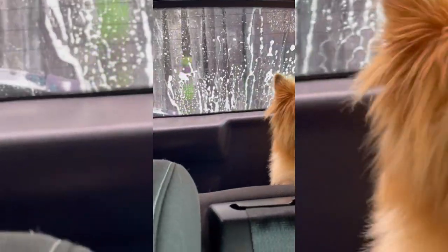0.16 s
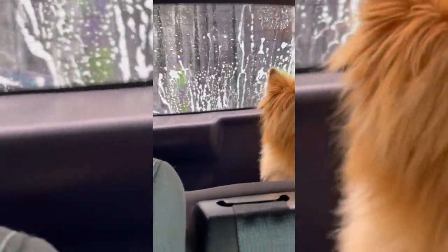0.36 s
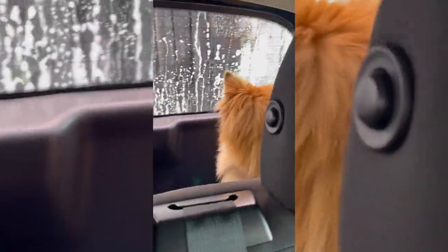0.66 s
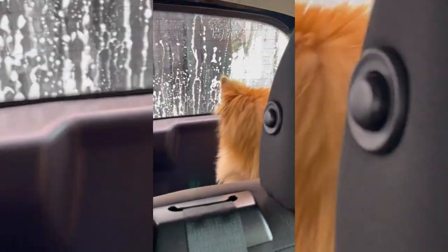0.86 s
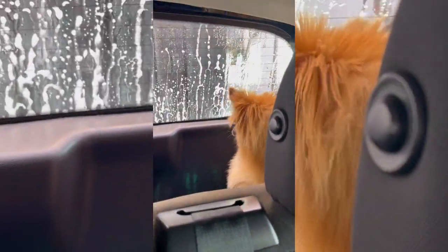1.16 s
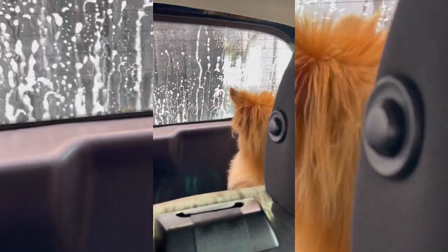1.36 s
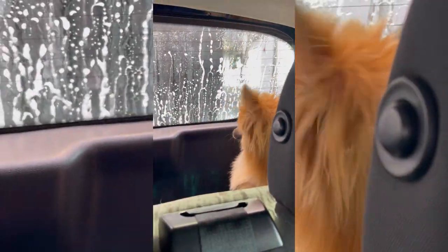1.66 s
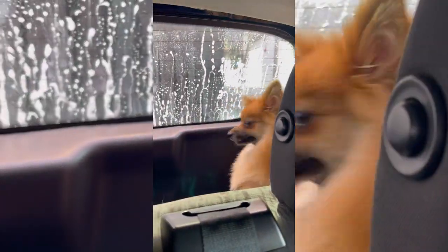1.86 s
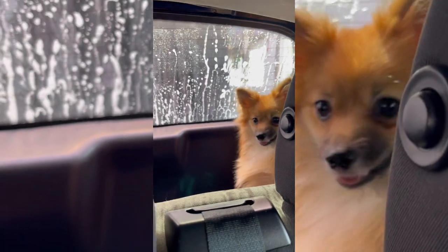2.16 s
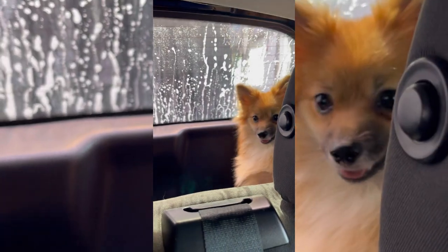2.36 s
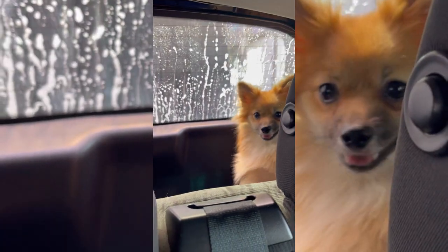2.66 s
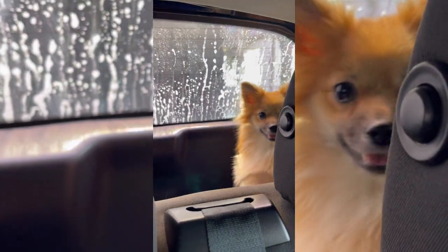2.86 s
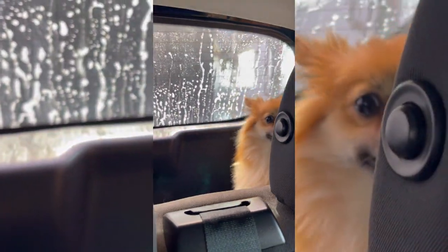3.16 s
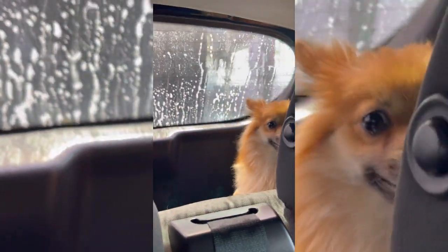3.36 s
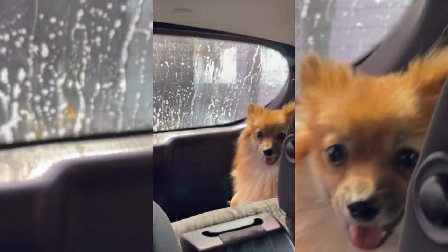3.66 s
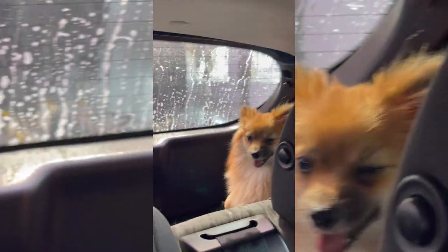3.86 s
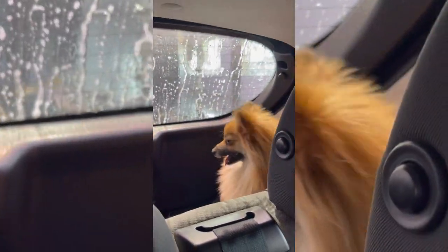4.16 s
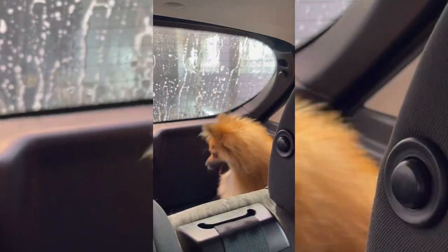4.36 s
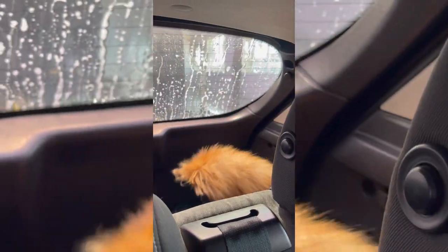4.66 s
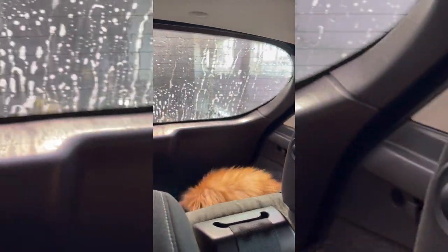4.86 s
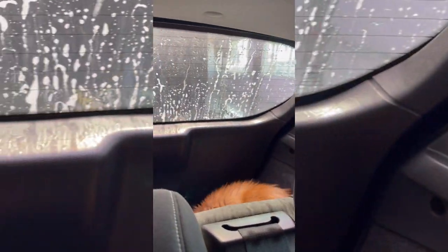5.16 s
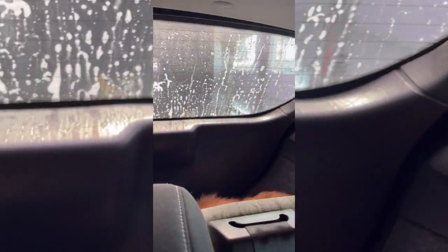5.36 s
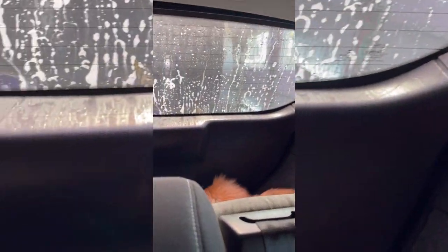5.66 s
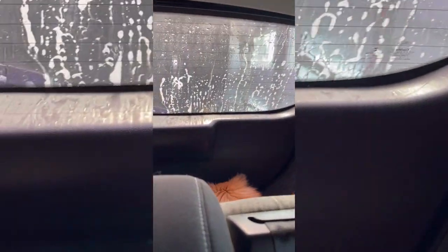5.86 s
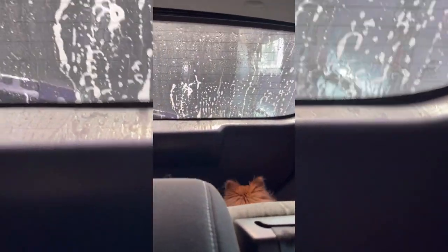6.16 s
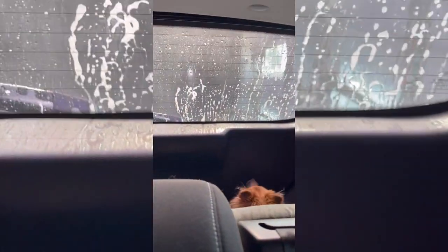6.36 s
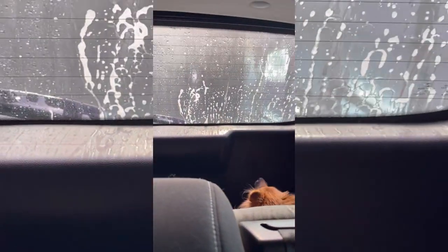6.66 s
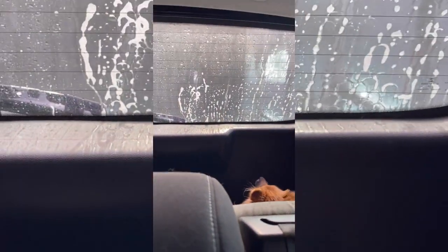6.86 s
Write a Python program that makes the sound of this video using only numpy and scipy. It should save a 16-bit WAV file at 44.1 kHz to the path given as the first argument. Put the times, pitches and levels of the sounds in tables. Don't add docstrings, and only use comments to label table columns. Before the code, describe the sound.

Heard from inside a closed car at a wash: a deep, unsteady motor hum and rumble run throughout, with a faint pump whine. Pressure jets sweep past in pairs of short hisses, while water thuds dully on roof and doors. The sweeps soften midway, then the spray closes in, splashing brightly on the glass and booming on the sheet metal. A phone microphone in the cabin catches it in stereo.

```python
import sys
import numpy as np
from scipy import signal
from scipy.fft import rfft, irfft, next_fast_len
from scipy.io import wavfile
from scipy.ndimage import uniform_filter1d, map_coordinates

SR = 44100
rng = np.random.default_rng(int(sys.argv[2]) if len(sys.argv) > 2 else 0)


def makeup_ratio(level_db):
    decades = np.asarray(level_db, float) / 20
    return 10 ** decades


def master_out(mix):
    frames = np.transpose(np.atleast_2d(mix))
    ceiling = np.clip(frames, -1, 1)
    pcm = np.round(ceiling * 32767).astype(np.int16)
    wavfile.write(sys.argv[1], SR, pcm)


N = 309141


def unit(x):
    return x / np.sqrt(np.mean(x ** 2) + 1e-20)


def along(points, hz):
    f, v = np.transpose(points)
    return np.interp(np.log(hz + 1), np.log(f + 1), v)


def gains(rows):
    s, *cols = np.transpose(rows)
    return [makeup_ratio(np.interp(np.arange(N) / SR, s, c)) for c in cols]


def wobble(rate_hz):
    knots = rng.standard_normal(int(N * rate_hz / SR) + 4)
    return map_coordinates(knots, [np.arange(N) * rate_hz / SR])


def filtered(x, response):
    m = next_fast_len(N + 8192)
    return irfft(rfft(x, m) * response(np.fft.rfftfreq(m, 1 / SR)), m)[..., :N]


def coloured(x, spectrum):
    return unit(filtered(x, lambda hz: makeup_ratio(along(spectrum, hz))))


def modes(table):
    def response(hz):
        ring = 0
        for k, (centre_hz, width_hz, db) in enumerate(table):
            damping = 1j * hz * width_hz
            ring = ring + (-1) ** k * makeup_ratio(db) * damping / (centre_hz ** 2 - hz ** 2 + damping)
        return ring / (1 + 1j * hz / (3 * table[-1][0])) ** 2
    return response


def water(density, spread_db, patchy_db):
    z = rng.standard_normal((2, 2, 257, N // 256 + 2))
    field = uniform_filter1d(rng.standard_normal(z.shape[2:]), 6, 0)
    patches = makeup_ratio(patchy_db * unit(uniform_filter1d(field, 12, 1)))
    bed = signal.istft((z[0] + 1j * z[1]) * patches, window="cosine", nperseg=512)[1][:, :N]
    at = rng.integers(N, size=int(density * N / SR))
    size = makeup_ratio(spread_db * rng.standard_normal(len(at)))
    drops = np.zeros((2, N))
    drops[:, at] = size * rng.choice([-1, 1], (2, len(at)))
    return unit(bed) + 0.65 * unit(drops)


def passes(rows, rise_db_s, fall_db_s, swell_db, crest, steep):
    hop = 64
    s, length, *levels = np.transpose(rows)[:, :, None]
    t = np.arange(0, N + hop, hop) / SR - s
    arch_db = -swell_db * ((np.clip(t / length, 0, 1) - crest) / crest) ** 2
    shape_db = rise_db_s * np.minimum(t, 0) - fall_db_s * np.maximum(t - length, 0) + arch_db
    curves = []
    for db, k in zip(levels, [1, steep]):
        gain = np.sqrt(np.sum(makeup_ratio(2 * (db + k * shape_db)), axis=0))
        curves.append(np.interp(np.arange(N), np.arange(t.shape[1]) * hop, gain))
    return curves


def pumps():
    # (time [s], hum [dB], whine [dB])
    motor_load = [(0.0, -27, -52), (0.19, -31, -52), (0.3, -31, -34), (0.53, -23.5, -52), (1.03, -27, -46),
                  (1.31, -19.5, -56), (1.64, -25.5, -35), (1.91, -23, -55), (2.05, -41, -41),
                  (2.34, -30, -51), (2.75, -34.5, -44), (2.95, -21.5, -44), (3.2, -32, -43),
                  (4.04, -27, -44), (4.72, -48, -48.5), (5.4, -24.5, -38), (6.1, -26.5, -42),
                  (7.01, -40, -37)]
    # (frequency [Hz], level [dB/Hz])
    cabin_spectrum = [(15, -47), (30, -7.5), (45, 2), (60, 0), (80, -4.5), (250, -9), (500, -26),
                      (1000, -39.5), (2000, -39), (5000, -51.5), (9500, -53), (10800, -86), (12000, -84),
                      (16000, -120)]
    hum_hz, whine_hz, whine_width_hz = 59.17, 713.5, 7
    hum_waver_db = 1 * (wobble(5) + wobble(16))
    whine_waver_db = 1.5 * wobble(7)
    hum_gain, whine_gain = gains(motor_load) * makeup_ratio([hum_waver_db, whine_waver_db])
    hum = np.sin(2 * np.pi * np.cumsum(hum_hz * (1 + 0.02 * wobble(6))) / SR)
    whine = unit(filtered(rng.standard_normal(N), modes([(whine_hz, whine_width_hz, 0)])))
    lines = hum_gain * hum + 0.56 * whine_gain * whine
    bay = coloured(water(density=3000, spread_db=-4.0, patchy_db=1.5), cabin_spectrum)
    rumble = makeup_ratio(-27.5 + 0.6 * wobble(2.81)) * bay
    return rumble + lines * [[1], [0.3]]


def follow(db, power):
    # (time [s], level [dB])
    nearness = [(0.0, -59.5), (0.8, -55.5), (1.5, -55), (2.2, -57), (3.2, -55), (3.7, -53), (4.2, -53),
                (4.45, -50), (4.75, -53.5), (5.25, -52.5), (5.57, -45.5), (5.92, -48.5), (6.0, -42),
                (6.45, -40.5), (6.54, -43), (6.63, -39.5), (6.83, -42.5), (7.01, -40)]
    return makeup_ratio(db) * (gains(nearness)[0] / makeup_ratio(-56)) ** power


def gouts():
    # (time [s], length [s], roof level [dB], door level [dB])
    landings = [(0.25, 0.029, -26.5, -50), (0.74, .1, -27, -50), (0.98, 0.02, -25.5, -35),
                (1.26, .04, -21.5, -36), (1.47, 0.019, -22.5, -42), (1.76, 0.038, -21, -37),
                (1.97, 0.035, -22.5, -54), (2.28, 0.18, -26.5, -37), (2.79, 0.12, -27, -41),
                (3.04, 0.035, -26.5, -37), (3.4, 0.057, -25.5, -34), (3.59, 0.034, -29, -34.5),
                (3.87, 0.11, -27, -34.5), (4.29, 0.13, -24, -25), (4.57, 0.026, -27.5, -24.5),
                (4.82, 0.077, -20.5, -28), (5.05, 0.084, -19.5, -29.5), (5.39, .04, -20, -26.5),
                (5.51, .04, -30, -26), (5.63, 0.013, -20, -24.5), (5.85, 0.1, -26, -24.5),
                (6.09, 0.048, -15, -22.5), (6.37, 0.085, -14.5, -22.5), (6.55, .03, -23, -36),
                (6.61, 0.037, -11, -26.5), (6.72, 0.037, -27.5, -43), (6.89, 0.094, -14.5, -22.5)]
    return passes(landings, rise_db_s=200, fall_db_s=142, swell_db=0.5, crest=0.5, steep=0.93)


def flows():
    # (time [s], length [s], sizzle [dB], swish [dB])
    strokes = [(0.71, 0.09, -60, -54), (0.92, 0.09, -57, -52), (1.205, 0.13, -52.5, -49),
               (1.42, 0.094, -50.5, -48.5), (1.715, 0.16, -50.5, -48.5), (1.93, 0.1, -49.5, -47.5),
               (2.255, .13, -49, -46), (2.44, 0.1, -49.5, -47), (2.76, 0.15, -49.5, -45.5),
               (2.95, 0.11, -51, -47.5), (3.27, .13, -48.5, -47), (3.44, 0.13, -50, -49),
               (3.785, 0.15, -50.5, -50.5), (3.95, 0.16, -53, -53), (4.28, 0.15, -54, -53),
               (4.47, .15, -56, -59), (4.81, 0.16, -58, -57), (5.01, 0.17, -58.5, -58),
               (5.31, 0.087, -56, -56), (5.52, 0.31, -56, -64), (5.82, 0.19, -49, -51),
               (6.04, 0.26, -49, -47), (6.31, 0.11, -44.5, -44.5), (6.44, 0.035, -53, -56),
               (6.56, 0.2, -45.5, -46), (6.79, .2, -42.5, -42)]
    shape = dict(fall_db_s=226, swell_db=1.5, crest=0.69, steep=0.8)
    out_strokes = passes(strokes[0::2], rise_db_s=800, **shape)
    back_strokes = passes(strokes[1::2], rise_db_s=250, **shape)
    sizzle, swish = makeup_ratio(1.0) * np.hypot(out_strokes, back_strokes)
    door = gouts()[1]
    return (np.hypot(sizzle, follow(db=-73.5, power=2.0)),
            np.hypot(swish, follow(db=-60.5, power=0.77)),
            np.hypot(makeup_ratio(-7) * swish, follow(db=-55.5, power=1.08)),
            np.hypot(makeup_ratio(-16) * door, follow(db=-45.5, power=0.46)))


def jet(sizzle, swish, splash, wash):
    # (frequency [Hz], level [dB/Hz])
    fine_spectrum = [(6000, -33), (7500, -6), (9000, -0.5), (10800, 5), (12000, -10.5), (13000, -19),
                     (14000, -24), (16000, -55)]
    swish_spectrum = [(2000, -21), (3500, -9), (4800, -5), (6200, -0.5), (7500, -5), (8800, -23),
                      (10500, -34)]
    coarse_spectrum = [(900, -29), (1700, -7.5), (2500, -1.5), (3300, -6), (4500, -4), (6500, -12.5),
                       (9000, -69)]
    wash_spectrum = [(350, -42), (600, 4.5), (800, -0.5), (950, 0), (1400, -2.5), (1700, -8.5), (2100, -18),
                     (3000, -59)]
    mist = makeup_ratio(0.54 * wobble(40)) * water(density=6000, spread_db=-1.0, patchy_db=2.5)
    coarse = water(density=2500, spread_db=2.5, patchy_db=2.0)
    runoff = water(density=1500, spread_db=2.5, patchy_db=0.54)
    idle = makeup_ratio(-73)
    hiss = makeup_ratio(3.0) * (sizzle + idle) * coloured(mist, fine_spectrum)
    hiss += makeup_ratio(-1.0) * swish * coloured(mist, swish_spectrum)
    hiss += splash * coloured(coarse, coarse_spectrum)
    return hiss + makeup_ratio(1.0) * wash * coloured(runoff, wash_spectrum)


def panels():
    # (frequency [Hz], width [Hz], level [dB])
    roof_modes = [(93.8, 17.7, -1), (131.6, 19.5, 1.5), (162, 26.7, 2.2), (203.4, 52, -2.5)]
    door_modes = [(290, 20.7, 1), (343, 75.4, -1.5), (437.6, 111, -4.5), (600, 262, -15.5)]
    roof, door = gouts()
    roof = np.hypot(roof, follow(db=-32.5, power=0.1))
    door = np.hypot(door, follow(db=-32.5, power=0.32))
    roof_hits = water(density=150, spread_db=3, patchy_db=-0.86)
    door_hits = water(density=400, spread_db=2.0, patchy_db=0.24)
    drum = makeup_ratio(-3.5) * roof * unit(filtered(roof_hits, modes(roof_modes)))
    return drum + makeup_ratio(-1.98) * door * unit(filtered(door_hits, modes(door_modes)))


def spits():
    # (time [s], level [dB])
    edge_hits = [(1.2, -45), (1.715, -45), (2.25, -47), (2.765, -46), (3.96, -48), (4.27, -46), (5.13, -49),
                 (6.26, -42), (6.31, -42), (6.55, -43), (6.8, -42), (6.86, -42), (6.93, -42)]
    t60_s, centre_hz, width_hz = 0.045, 14200, 2500
    t = np.arange(8192) / SR
    shape = np.zeros(N + SR)
    for s, db in edge_hits:
        shape[round(s * SR):][:len(t)] += makeup_ratio(db - 60 * t / t60_s)
    noise = rng.standard_normal((2, N))
    return shape[:N] * filtered(noise, lambda hz: np.exp(-((hz - centre_hz) / width_hz) ** 2))


def pane(splash):
    # (frequency [Hz], width [Hz], level [dB])
    glass_modes = [(2290, 130, 7), (2740, 170, 2), (2850, 110, -9), (3500, 48, 6), (4110, 66, 4),
                   (4230, 86, -3)]
    # (time [s], frequency [Hz], level [dB], t60 [s])
    heavy_drops = [(1.779, 188.2, -21, 0.36), (4.062, 923, -33.5, 0.071), (4.6, 600, -35, 0.028),
                   (4.849, 290, -21.5, 0.52), (5.08, 290, -21.5, .3), (5.39, 128, -19, .2),
                   (6.12, 124.5, -16.5, 0.32), (6.41, 125, -17, .35), (6.639, 135, -13.5, 0.33),
                   (6.94, 130, -16.5, 0.37), (6.12, 3530, -37, 0.065), (6.17, 2940, -39, .06),
                   (6.24, 2530, -39, .06), (6.28, 2690, -38, .08), (6.44, 2350, -36, .06),
                   (6.44, 2800, -31.5, 0.046), (6.5, 2800, -38, 0.055), (6.64, 2720, -36, .1),
                   (6.87, 3450, -38, .06), (6.6, 3500, -38, 0.086), (6.75, 2220, -38, 0.089)]
    noise = rng.standard_normal((2, 1, N))
    each = filtered(noise, lambda hz: np.array([modes([mode])(hz) for mode in glass_modes]))
    flare = makeup_ratio([3.3 * wobble(35) for _ in glass_modes])
    ring = np.sum(flare * each, axis=1)
    t = np.arange(-6000, 9000) / SR
    plop = np.zeros(N + SR)
    for s, hz, db, t60_s in heavy_drops:
        envelope = makeup_ratio(db - 60 * np.abs(t) / t60_s)
        plop[round((s + t[0]) * SR):][:len(t)] += envelope * np.sin(2 * np.pi * hz * t)
    return makeup_ratio(2.0) * splash ** 1.203 * unit(ring) + plop[:N] * [[1], [0.6]]


def scene():
    # (frequency [Hz], level [dB])
    scatter = [(40, -60), (70, -43), (110, -33), (180, -28), (320, -19), (750, -6.5), (1400, -6.5),
               (1900, -17), (2600, -10), (4000, -8), (4950, -10), (5400, -6), (5900, -22), (12000, -22)]
    flow = flows()
    field = pumps() + jet(*flow) + panels() + spits() + pane(flow[2])

    def split(hz):
        share = makeup_ratio(along(scatter, hz))
        return np.array([hz ** 0, share]) / np.sqrt(1 + share ** 2)
    common, apart = filtered(field, split)
    return np.array([common + apart, common - apart])


def squelch(pair):
    # (frequency [Hz], level [dB])
    audible = [(4000, -110), (8000, -97), (11000, -100), (12000, -94), (13200, -86), (13700, -79),
               (15000, -82)]
    hz, _, z = signal.stft([pair[0] + pair[1], pair[0] - pair[1]], SR, nperseg=2048)
    hz = hz[:1024]
    bands = np.abs(z[:, :1024].reshape(2, 64, 16, -1) / 2) ** 2
    power = np.mean(bands, axis=2).repeat(16, axis=1)
    masked = (hz[:, None] > 7000) * makeup_ratio(-35) * power[::-1]
    fickle_db = 3 * rng.standard_normal((64, power.shape[-1])).repeat(16, axis=0)
    fickle_db = fickle_db * (hz[:, None] > 11500)
    floor = makeup_ratio(2 * (along(audible, hz)[:, None] + fickle_db))
    z[:, :1024] *= power > floor + masked
    mid, side = signal.istft(z, SR, nperseg=2048)[1][:, :N] / 2
    return np.array([mid + side, mid - side])


def band_limit(x):
    return signal.sosfilt(signal.butter(12, 14880, fs=SR, output="sos"), x)


def record(dry):
    # (frequency [Hz], phase [rad])
    lead = [(0, 0), (1700, 0.05), (3000, 1.15), (4000, .8), (4500, 1.7), (4950, 3.14), (5300, 4.8),
            (5720, 6.15), (6100, 6.35), (6400, 7), (8800, 9.15), (9450, 9.6), (11000, 11.25), (11700, 12.1),
            (12300, 12.5), (22050, 12.56)]

    def lag(hz):
        half = np.exp(0.5j * np.interp(hz, *np.transpose(lead)))
        return np.array([half, half.conj()])
    ports = filtered(dry, lag)
    ports = ports / (1 + np.abs(ports / 0.7) ** 4) ** (1 / 4)
    return band_limit(squelch(ports))


dry = scene()
out = record(dry)
master_out(out)
```